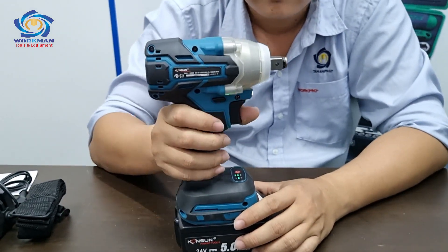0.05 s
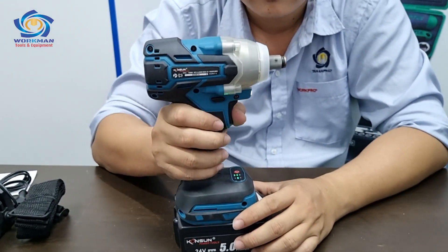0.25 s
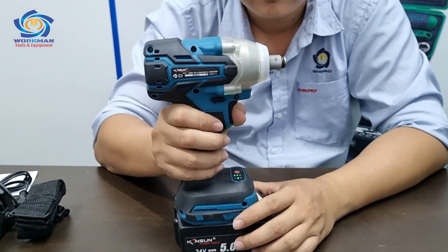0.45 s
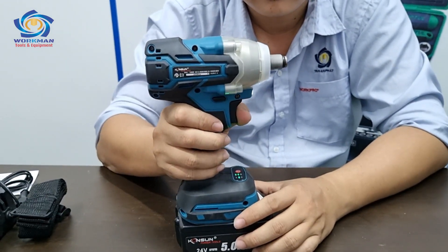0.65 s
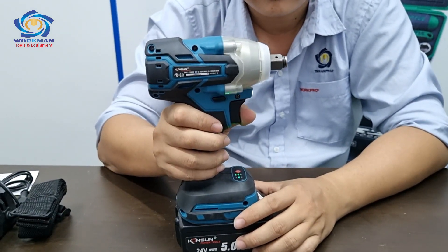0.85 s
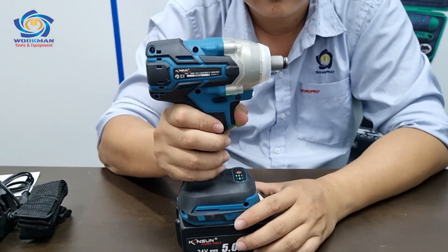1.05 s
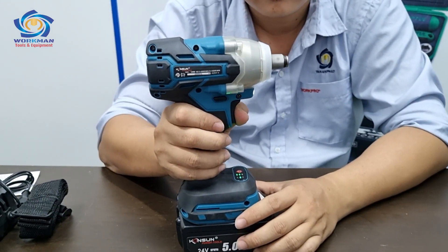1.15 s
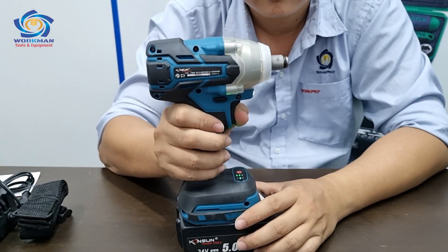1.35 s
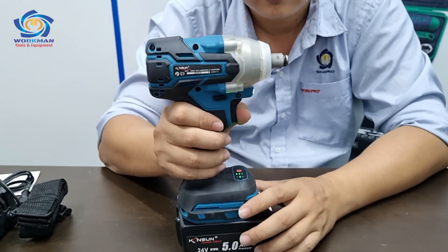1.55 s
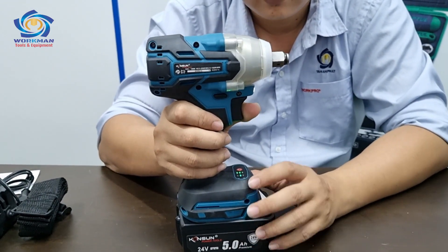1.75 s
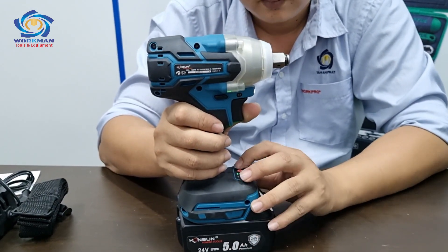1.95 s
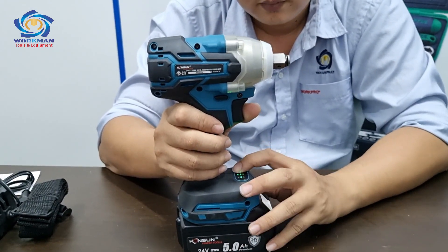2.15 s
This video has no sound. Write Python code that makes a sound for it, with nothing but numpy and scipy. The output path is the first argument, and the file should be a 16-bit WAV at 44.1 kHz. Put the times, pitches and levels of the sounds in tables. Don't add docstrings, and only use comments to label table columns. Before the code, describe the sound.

Impact wrench free-spins in a short burst, pauses, then spins again slightly longer; each run clicks on, claps, whines with gear rattle and stops abruptly with dull knocks. Close microphone, hard-walled small room, faint engine throb behind.

```python
import sys
import numpy as np
from scipy import signal
from scipy.fft import rfft, irfft
from scipy.io import wavfile

SR = 44100
rng = np.random.default_rng(int(sys.argv[2]) if len(sys.argv) > 2 else 0)


def how_loud(loudness_db):
    steps = np.asarray(loudness_db, float) / 20
    return 10 ** steps


def wav_out(sig):
    wavfile.write(sys.argv[1], SR, np.round(np.clip(np.atleast_2d(sig).T, -1, 1) * 32767).astype(np.int16))


N = 97020
TIME = np.arange(N) / SR

# frequency in Hz, level in dB per Hz.
AIR_SPECTRUM = [(15, -34), (25, -13.5), (76, -6), (99, -17), (277, -15), (489, -21), (863, -31),
                (1160, -34), (16000, -72.5)]
# frequency in Hz, width in Hz, level in dB rms.
FAINT_WHISTLES = [(4380, 140, -73.5), (9280, 1200, -77)]
# time in seconds, firing rate in Hz, level in dB.
FAR_ENGINE = [(0.03, 71.7, -40), (0.25, 70.2, -42), (0.8, 70.7, -35), (0.87, 71.6, -49), (0.93, 73.6, -41),
              (1.14, 74.2, -35), (1.18, 73.7, -54), (1.27, 72, -29), (1.43, 71.3, -45), (1.56, 78.9, -40),
              (1.98, 74, -53), (2.05, 73.2, -35.5), (2.18, 68.4, -44), (2.19, 69, -60)]
# frequency near the band's upper edge in Hz, time to fall 60 dB in seconds, level in dB.
ROOM_BANDS = [(324, 0.61, -2.5), (926, 0.33, -6), (2380, 0.75, -7), (4200, 0.33, -15.5), (7740, 0.58, -10),
              (11140, 0.47, -12)]
# time in seconds, peak in dB.
SWITCH_TICKS = [
    (.2297, -27),
    (.2347, -24),
    (.9681, -26),
    (.9728, -23),
]
# frequency in Hz, level in dB, time to fall 60 dB in seconds.
SWITCH_MODES = [(3200, -15.5, 0.0076), (4200, -12.5, 0.01), (6500, -15.5, 0.0071), (8100, -12, 0.015),
                (8840, -12.5, 0.015), (12800, -9, 0.0046), (14000, -25, .004)]
# time in seconds, peak in dB.
BACKLASH_KNOCKS = [
    (.735, -15),
    (.744, -27.5),
    (.762, -20),
    (1.630, -13),
    (1.642, -20),
    (1.649, -44),
    (1.661, -15),
]
# frequency in Hz, level in dB, time to fall 60 dB in seconds.
GRIP_MODES = [(192.7, -15, 0.15), (702, -7.5, 0.019), (976, -9.5, 0.017), (4210, -6, .007),
              (9250, -11, 0.0013), (12000, -9, 0.0026)]
# time in seconds, peak in dB.
HAMMER_CLAPS = [
    (.2705, -14),
    (.2709, -1),
    (.2868, -26),
    (1.0109, -12),
    (1.0113, -4),
    (1.0268, -28),
]
# frequency in Hz, level in dB, time to fall 60 dB in seconds.
ANVIL_MODES = [(1100, -7.5, 0.0047), (1750, -14.5, 0.011), (2550, -15.5, 0.011), (3970, -3, 0.012),
               (4170, -6, 0.018), (4230, -24, .011), (6440, -22, 0.017), (7970, -7.5, .005),
               (8700, -7.5, 0.0054), (9330, -9, 0.0072), (9850, -20, 0.0035), (11980, -13.5, 0.0056)]
# time in seconds, speed in
ROTOR_SPEED = [
    (.229, 8),
    (.316, 147),
    (.358, 208),
    (.38, 228),
    (.415, 238),
    (.48, 239.6),
    (.66, 239.5),
    (.733, 212),
    (.776, 65),
               (.969, 8),
    (1.054, 144),
    (1.1, 210),
    (1.122, 229),
    (1.155, 238.6),
    (1.19, 240.7),
    (1.604, 241),
    (1.632, 220),
    (1.676, 65),
]
# power on, brake on and brake off, all in seconds.
RUNS = [
    (.2388, .733, .765),
    (.9806, 1.629, 1.665),
]
LOAD_ORDERS = [1, 4, 8, 12, 16, 20, 24, 28]
# speeding up in dB, braking in dB.
LOAD_LEVELS = [(-38, -30), (-35, -23), (-42, -36), (-32, -36), (-22.5, -24), (-28, -34), (-30.5, -26),
               (-33, -32)]
# frequency in Hz, level in dB.
STATOR_RADIATION = [(200, -4), (400, -9), (740, 0), (1000, -20), (2150, -26), (2500, 0), (4900, -9),
                    (5700, -24)]
WHINE_ORDERS = [1, 3, 6, 6.257, 12, 12.157, 12.53, 13, 16, 32]
# full-speed level in dB rms, wobble in dB, growth as a power of speed.
WHINE_LEVELS = [(-47, 2.5, 3), (-47, 2.5, 3), (-46, 2.5, 4), (-34.5, .8, 4), (-39, 1.2, 5), (-41, 2.5, 5),
                (-46, 2.5, 5), (-47, 2.5, 5), (-48, 2.5, 5), (-48, .8, 15)]
# frequency in Hz, width in Hz, level in dB.
HOUSING = [(214, 270, -2.5), (518, 120, 1), (676, 95, 0.5), (1343, 415, 1), (1990, 376, -3),
           (2455, 290, -2.5), (2914, 354, 1.5), (3980, 666, 4), (4602, 510, 2), (5616, 460, -15.5),
           (9180, 2200, -15), (12530, 1730, -13.5), (15100, 1000, -20.5)]

FULL_HZ = 241


def rms_one(x):
    return x / np.sqrt(np.mean(x ** 2) + 1e-20)


def drift(rate):
    r = np.exp(-2 * np.pi * rate / SR)
    wander = signal.lfilter([1], [1, -2 * r, r * r], rng.standard_normal(N + SR))
    return rms_one(wander[SR:])


def resonance(x, hz, width):
    r = np.exp(-np.pi * width / SR)
    peak = np.array([1, 0, -1]) * (1 - r * r) / 2
    return signal.lfilter(peak, [1, -2 * r * np.cos(2 * np.pi * hz / SR), r * r], x)


def ring(x, hz, t60):
    r, w = how_loud(-60 / (t60 * SR)), 2 * np.pi * hz / SR
    return signal.lfilter([0, np.sin(w)], [1, -2 * r * np.cos(w), r * r], x + 1e-18)


def struck(hits, modes):
    out = np.zeros(N)
    s, db = np.transpose(hits)
    for hz, level_db, t60 in modes:
        clicks = np.zeros(N)
        clicks[(s * SR).astype(int)] = how_loud(db + level_db + rng.normal(0, 1.5, len(s)))
        out += ring(clicks, hz, t60)
    return out


def gate(on, off, edge):
    return np.clip((TIME - on) / edge, 0, 1) * np.clip((off - TIME) / edge + 1, 0, 1)


def clicks_at(cycles, sizes):
    count = np.arange(1, int(cycles[-1]))
    place = np.interp(count, cycles, np.arange(N))
    out = np.zeros(N + 1)
    np.add.at(out, place.astype(int), sizes[count] * (1 - place % 1))
    np.add.at(out, place.astype(int) + 1, sizes[count] * (place % 1))
    return out[:N]


def far_engine():
    s, hz, db = np.transpose(FAR_ENGINE)
    firing_hz = np.interp(TIME, s, hz) * (1 + 0.0275 * drift(6.65))
    phase = 2 * np.pi * np.cumsum(firing_hz) / SR
    throb = np.sin(phase) + 0.31 * np.cos(2 * phase) - 0.14 * np.sin(3 * phase)
    return throb * how_loud(np.interp(TIME, s, db) + 0.5)


def background():
    hz, db = np.transpose(AIR_SPECTRUM)
    shape = how_loud(np.interp(np.log(np.fft.rfftfreq(N, 1 / SR) + 1), np.log(hz), db))
    air = how_loud(-40) * rms_one(irfft(rfft(rng.standard_normal(N)) * shape, N))
    whistles = 0
    for hz, width, db in FAINT_WHISTLES:
        narrow = resonance(resonance(rng.standard_normal(N), hz, width), hz, width)
        whistles = whistles + how_loud(db) * rms_one(narrow)
    hum = how_loud(-43) * rms_one(resonance(rng.standard_normal(N), 100, 5.6))
    return air + whistles + far_engine() + hum


def room(x):
    t, tail = np.arange(SR) / SR, 0
    for hz, t60, db in ROOM_BANDS:
        edges = [hz / 1.79, min(hz * 1.12, 17000)]
        band_pass = signal.butter(2, edges, "band", fs=SR, output="sos")
        band = signal.sosfilt(band_pass, rng.standard_normal(SR))
        fall = how_loud(-60 * t / t60) * np.clip((t - .003) / .006, 0, 1)
        tail = tail + how_loud(db) * band * fall / np.sqrt(np.sum(fall ** 2))
    return signal.fftconvolve(x, tail)[:N]


def switch_ticks():
    return struck(SWITCH_TICKS, SWITCH_MODES)


def backlash_knocks():
    return struck(BACKLASH_KNOCKS, GRIP_MODES)


def hammer_claps():
    return struck(HAMMER_CLAPS, ANVIL_MODES)


def magnetic_kicks(turns, share):
    scatter_db, fades_at = 2.5, .28
    kicks = 0
    for on, brake, stop in RUNS:
        cycles = 4 * (turns - turns[int(on * SR) + 8]) + 1
        sizes = how_loud(scatter_db * rng.standard_normal(N))
        kicks = kicks + gate(on - 1e-4, brake, 1e-4) * clicks_at(cycles, sizes)
    return kicks * np.exp(-(share / fades_at) ** 2)


def load_harmonics(speed, turns, share, braking):
    fades_at, fade, full_at, wobble_db = .85, .06, .55, 1.5
    powered = sum(gate(on - 1e-4, brake, 1e-4) for on, brake, stop in RUNS)
    starting = powered / (1 + np.exp((share - fades_at) / fade))
    growth = np.minimum(share / full_at, 1) ** 2
    stator_hz, stator_db = np.transpose(STATOR_RADIATION)
    load = 0
    for k, (up_db, down_db) in zip(LOAD_ORDERS, LOAD_LEVELS):
        level = how_loud(up_db) * starting * growth + how_loud(down_db) * braking
        radiated_db = np.interp(np.log(k * speed), np.log(stator_hz), stator_db)
        level = level * how_loud(wobble_db * drift(90) + radiated_db)
        load = load + level * np.sin(2 * np.pi * k * turns + 1.262 * k)
    return load


def gear_rattle(turns, share, running, braking):
    mesh, planet = 6.257, .294
    repeating, tooth_scatter_db = .55, 2.3
    worn = np.resize(rng.standard_normal(59), N)
    teeth = repeating * worn + np.sqrt(1 - repeating ** 2) * rng.standard_normal(N)
    teeth = teeth * how_loud(tooth_scatter_db * rng.standard_normal(N))
    clicks = clicks_at(2 * mesh * turns, rms_one(teeth)) * np.sqrt(SR / 2 / mesh / FULL_HZ)
    swell_db = 2.6 * np.sin(2 * np.pi * planet * turns) + 4.5 * braking
    return clicks * running * share ** 0.17 * how_loud(-30.5 + swell_db + 0.98 * drift(16.7))


def housing(drive):
    body = 0
    for k, (hz, width, db) in enumerate(HOUSING):
        body = body + (-1) ** k * how_loud(db) * resonance(drive, hz, width)
    return 2.485 * body


def whines(turns, share):
    tones = 0
    for k, (db, wobble_db, power) in zip(WHINE_ORDERS, WHINE_LEVELS):
        level = how_loud(db + wobble_db * drift(29)) * share ** power
        tones = tones + level * np.sin(2 * np.pi * k * turns + 1.21 * k)
    return np.sqrt(2) * tones


def fan_hiss(share):
    high_pass = signal.butter(2, 5540, "high", fs=SR, output="sos")
    return how_loud(-57.5) * signal.sosfilt(high_pass, rng.standard_normal(N)) * share ** 1.5


def wrench():
    s, hz = np.transpose(ROTOR_SPEED)
    speed = np.interp(TIME, s, hz)
    turns, share = np.cumsum(speed) / SR, speed / FULL_HZ
    running = sum(gate(on, stop, 0.00416) for on, brake, stop in RUNS)
    braking = sum(gate(brake, stop, .004) for on, brake, stop in RUNS)
    kicks = magnetic_kicks(turns, share)
    bearings = how_loud(-35.5) * running * rng.standard_normal(N)
    rattle = gear_rattle(turns, share, running, braking)
    body = housing(how_loud(-26) * kicks + rattle + bearings + 1e-18)
    stator = load_harmonics(speed, turns, share, braking) + how_loud(-22) * ring(kicks, 2530, .022)
    return body + stator + whines(turns, share) * running * (1 - braking) + fan_hiss(share) * running


def scene():
    tool = wrench() + switch_ticks() + backlash_knocks()
    claps = hammer_claps()
    echo = room(tool + how_loud(-5) * claps)
    microphone_hiss = how_loud(-74.5) * rng.standard_normal(N)
    return (tool + claps + echo + background() + microphone_hiss)[None]


def roll_off(x):
    return signal.sosfilt(signal.butter(12, 16460, fs=SR, output="sos"), x)


def record(dry):
    bass_cut = signal.butter(3, 42, "high", fs=SR, output="sos")
    top_cut = signal.cheby2(14, 50, 16350, fs=SR, output="sos")
    x = signal.sosfilt(bass_cut, np.clip(dry, -1, 1))
    x = signal.sosfilt(top_cut, x)
    return roll_off(x)


dry = scene()
out = record(dry)
wav_out(out)
```